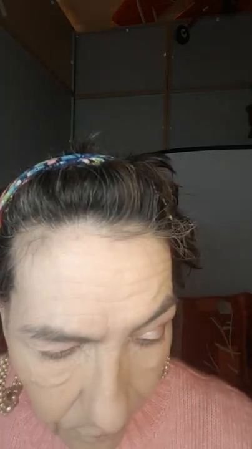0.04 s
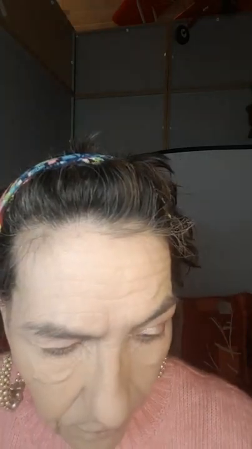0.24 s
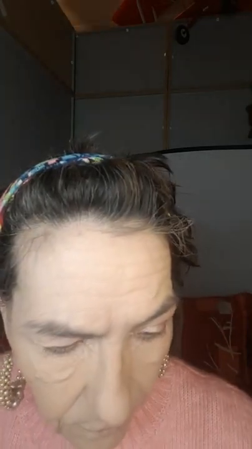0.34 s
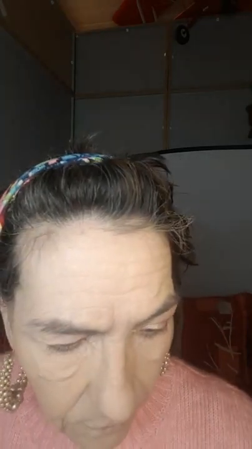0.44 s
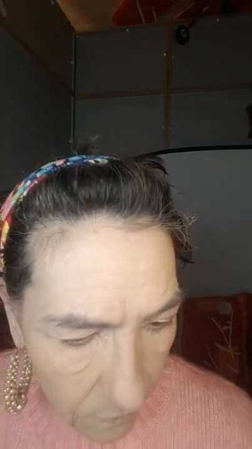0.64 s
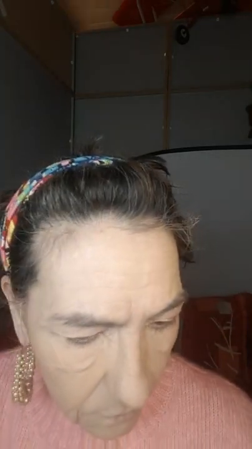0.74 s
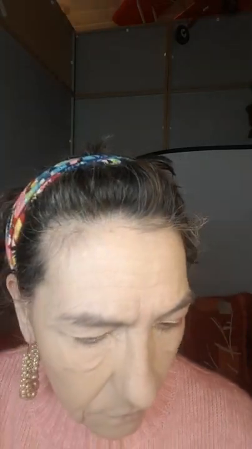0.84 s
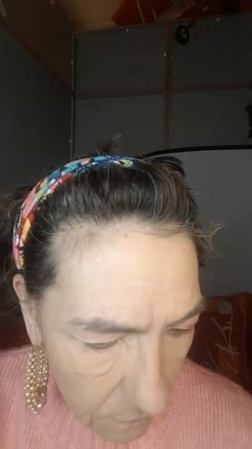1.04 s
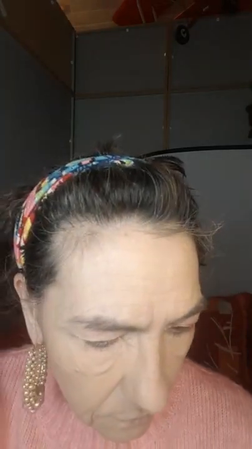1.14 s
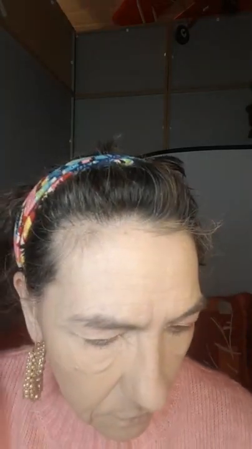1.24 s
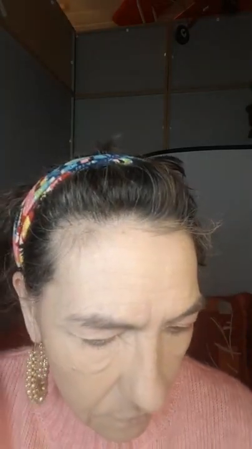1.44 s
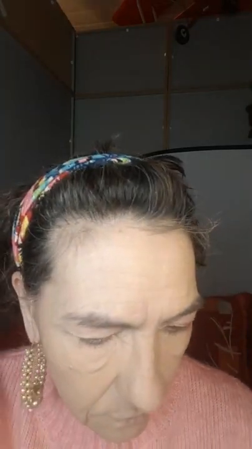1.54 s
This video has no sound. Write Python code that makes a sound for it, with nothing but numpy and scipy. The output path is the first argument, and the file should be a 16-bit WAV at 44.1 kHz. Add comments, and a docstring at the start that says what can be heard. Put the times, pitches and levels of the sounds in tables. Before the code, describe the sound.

Makeup items clatter on a table: a compact knocks down, a plastic case rattles, and a brush drops and bounces. Softer taps and a lid click follow, close to a phone microphone in a small room.

```python
"""Clicks and clatter of cosmetics handled on a table in a small room, close to a phone.
A compact is put down, a plastic case clatters, a brush drops and bounces, small items are nudged
and a lid clicks. Every contact rings the item, knocks the tabletop and gives a sharp tick.
Short skids and tiny metal clinks join in; the room answers over faint air noise and mains hum."""
import sys
import numpy as np
from scipy import signal
from scipy.fft import rfft, irfft, next_fast_len
from scipy.io import wavfile
from scipy.ndimage import map_coordinates

SR = 44100
rng = np.random.default_rng(int(sys.argv[2]) if len(sys.argv) > 2 else 0)


def to_wav(sig):
    """Store sig (one row per channel, or 1-D mono) as 16-bit WAV at the path in sys.argv[1].

    Samples outside -1..1 are clipped; the rate is SR.
    """
    pcm = np.clip(np.atleast_2d(sig), -1, 1) * 32767
    pcm = np.round(pcm).astype(np.int16)
    wavfile.write(sys.argv[1], SR, pcm.T)  # frames by channels


N = 70560


def amp(db):
    return 10 ** (np.asarray(db) / 20)


def along(points, hz):
    """Interpolate (frequency [Hz], value) points on a log axis."""
    point_hz, values = np.transpose(points)
    return np.interp(np.log(hz + 1), np.log(point_hz + 1), values)


def clock():
    """Time [s] over the half second after a contact."""
    return np.arange(SR // 2) / SR


def blow(x):
    """Scale x to the energy of one short blow: 5 ms at rms 1."""
    return x * np.sqrt(0.005 * SR / (np.sum(x ** 2) + 1e-20))


def add(track, start_s, x):
    """Mix x into the track."""
    part = track[max(round(start_s * SR), 0):][:len(x)]
    part += x[:len(part)]


def edge(x, hz, kind):
    """Third-order low-pass or high-pass."""
    return signal.sosfilt(signal.butter(3, hz, kind, fs=SR, output="sos"), x)


def noise(spectrum, size):
    """Coloured noise, rms 1."""
    gain = amp(along(spectrum, np.fft.rfftfreq(size, 1 / SR)))
    x = irfft(rfft(rng.standard_normal(size)) * gain, size)
    return x / x.std()


def burst(spectrum, t60_s):
    """Fast-decaying puff of noise."""
    t = clock()
    return blow(noise(spectrum, len(t)) * amp(-60 * t / t60_s))


def ring(modes, scatter_db, detune, attack_s, aligned=False):
    """Damped modes, varied per contact; aligned ones start in step, with a hard edge."""
    t = clock()
    hz, db, t60_s = np.transpose(modes)[:, :, None]
    level_draw, pitch_draw = rng.standard_normal((2, len(modes), 1))
    sign = 1 if aligned else (-1) ** np.arange(len(modes))[:, None]
    decay = amp(db + scatter_db * level_draw - 60 * t / t60_s)
    waves = sign * decay * np.sin(2 * np.pi * hz * (1 + detune * pitch_draw) * t)
    return blow(waves.sum(0) * (1 - np.exp(-t / attack_s)))


def background():
    """Quiet room air and faint mains hum."""
    air = [(12, -38), (20, -7), (26, -19.5), (54, 0), (74, -7.5), (106, -2.5), (125, -7), (207, -7.5),
           (548, -14.5), (724, -14), (1200, -17), (1370, -17), (6350, -30), (13800, -31), (15500, -21)]  # air spectrum (frequency [Hz], level [dB])
    air_db, hum_db, hum_hz = -70, -82.5, 100
    hum = np.sqrt(2) * np.sin(2 * np.pi * hum_hz * np.arange(N) / SR)
    return amp(air_db) * noise(air, N) + amp(hum_db) * hum


def room(x):
    """Direct sound, near reflections and diffuse tail."""
    walls = [(.0041, -21), (.0071, -17.5), (.0118, -18.5)]  # echoes off nearby surfaces (delay [s], level [dB])
    tail_decay = [(150, .36), (700, 0.41), (1600, 0.37), (4000, 0.35), (9000, 0.26), (14000, 0.17)]  # reverberation time (frequency [Hz], t60 [s])
    tail_colour = [(150, 0), (700, -4.5), (1600, 0), (4000, -1.5), (9000, -6), (14000, 4.5)]  # tail spectrum (frequency [Hz], level [dB])
    early_db, early_delay_s, early_t60_s = -14, 0.004, 0.054
    tail_db, tail_delay_s = -14, 0.01
    t = clock()
    hz, frame_s, bins = signal.stft(rng.standard_normal(len(t)), SR, nperseg=256)
    gain = amp(along(tail_colour, hz)[:, None] - 60 * frame_s / along(tail_decay, hz)[:, None])
    tail = signal.istft(bins * gain, SR, nperseg=256)[1][:len(t)]
    early = rng.standard_normal(len(t)) * amp(-60 * t / early_t60_s)
    response = signal.unit_impulse(len(t))
    for delay_s, db in walls:
        add(response, delay_s, amp(db) * np.hanning(5) / 2)
    add(response, early_delay_s, amp(early_db) * early / np.linalg.norm(early))
    add(response, tail_delay_s, amp(tail_db) * tail / np.linalg.norm(tail))
    return signal.fftconvolve(x, response)


def clinks():
    """Small metal parts touch with a thin, high chink."""
    touches = [(0.732, -76.5), (.7995, -62.5), (1.157, -75.5)]  # metal contacts (time [s], level [dB])
    metal = [(2000, -12.5), (4600, -13), (5500, -18), (7000, -9), (9300, -11), (10500, 1.5), (11600, -1),
             (12800, -12), (15000, -29)]  # chink spectrum (frequency [Hz], level [dB])
    track = np.zeros(N)
    for start_s, db in touches:
        add(track, start_s, room(amp(db) * burst(metal, t60_s=0.031)))
    return track


def slides():
    """Gritty friction as an item skids before it settles."""
    skids = [(.001, 0.031, -59.5), (0.2242, 0.025, -45.5), (0.378, 0.0067, -71), (0.44, 0.0095, -72),
             (0.894, 0.027, -59.5)]  # skids on the table (time [s], length [s], level [dB])
    scrape = [(300, 3), (1200, 15), (2500, 5), (5000, 0), (7000, -3), (9000, -8), (13000, -4), (15000, -16)]  # friction spectrum (frequency [Hz], level [dB])
    rough_db, grains_per_s = 6, 1100
    track = np.zeros(N)
    t = clock()
    for start_s, length_s, db in skids:
        roughness = map_coordinates(rng.standard_normal(len(t)), [t * grains_per_s], order=1)
        grit = amp(rough_db * roughness) * noise(scrape, len(t))
        stroke = np.sqrt(np.clip(4 * t / length_s * (1 - t / length_s), 0, 1))
        add(track, start_s, room(amp(db) * stroke * grit / grit.std()))
    return track


def tabletop(thump_db):
    """Knock on the table: distinct modes, dense wooden ring and low thump."""
    top_modes = [(462, -20, 0.14), (532.3, 2, 0.13), (547, -1.5, 0.14), (572.3, -1.5, .18), (685, -1, .16),
                 (729, -13, 0.42), (831, -0.5, 0.16), (888, -2.5, 0.095), (912, -12, .14), (966, -8.5, .12),
                 (1163, -11, .16)]  # tabletop modes (frequency [Hz], level [dB], t60 [s])
    low_modes = [(150.3, -7, .22), (171, -4, 0.21), (233, 1.5, 0.18), (268.3, -2, .18), (309.3, 1.5, .2),
                 (384, -0.5, 0.1)]  # its low modes (frequency [Hz], level [dB], t60 [s])
    grain = [(100, -19.5), (400, -28.5), (520, -3), (700, -1), (1000, -10.5), (1500, -11.5), (2500, -21),
             (6000, -52)]  # its dense ring (frequency [Hz], level [dB])
    knock = ring(top_modes, scatter_db=2, detune=0.008, attack_s=0.0006)
    thump = ring(low_modes, scatter_db=2.5, detune=0.02, attack_s=0.0077)
    wood = amp(5) * burst(grain, t60_s=0.065)
    return blow(knock + wood) + amp(thump_db) * thump


def item(hits, modes, crack_db, crack_t60_s, thump_db, tick_t60_s):
    """Contacts ring the item, knock the table and tick; softer ones ring duller."""
    crack_spectrum = [(100, -48), (400, -29.5), (700, 4), (2000, 4), (5000, 4), (10000, -1), (15000, 28)]  # noisy part of the ring (frequency [Hz], level [dB])
    tick_spectrum = [(500, 7), (3000, 2.5), (5500, 3), (7000, 1.5), (8000, -1), (8900, 6.5), (10200, -6.5),
                     (12000, -7), (14200, -15.5), (15500, -40)]  # contact tick (frequency [Hz], level [dB])
    low_cut_hz = 518
    track = np.zeros(N)
    for start_s, ring_db, hardness_hz, knock_db, tick_db in hits:
        body = ring(modes, scatter_db=3, detune=0.026, attack_s=0.000214, aligned=True)
        body += amp(crack_db) * burst(crack_spectrum, crack_t60_s)
        body = edge(body, hardness_hz, "lowpass")
        body = amp(ring_db) * blow(edge(body, low_cut_hz, "highpass"))
        knock = amp(knock_db) * tabletop(thump_db)
        tick = amp(tick_db) * burst(tick_spectrum, tick_t60_s)
        add(track, start_s, room(body + knock + tick))
    return track


def nudges():
    """Small items tap the table, too light for much thump."""
    hits = [(.616, -50, 2180, -49, -83), (.6375, -46, 1040, -54, -100), (.645, -57, 1190, -46.5, -94),
            (.652, -62, 1210, -68, -86), (.6903, -46.5, 1800, -90, -73), (.7003, -52.5, 1660, -59.5, -88),
            (.8905, -60.5, 5200, -51, -57), (.918, -43.5, 1790, -52, -65), (.945, -79, 2500, -58, -66.5),
            (.962, -65, 2520, -82, -76), (.978, -49, 1450, -65, -76), (1.49, -67.5, 980, -73, -95)]  # contacts (time [s], ring [dB], hardness [Hz], knock [dB], tick [dB])
    modes = [(689, 8, .018), (787, -7, 0.0049), (1114, 6.5, 0.012), (1468, 1.5, 0.023), (1868, 0.5, 0.024),
             (2350, 2.5, 0.017), (4760, -8, .008)]  # item modes (frequency [Hz], level [dB], t60 [s])
    return item(hits, modes, crack_db=10, crack_t60_s=0.013, thump_db=-21, tick_t60_s=0.053)


def lid():
    """A lid clicks: two contacts in quick succession."""
    hits = [(.9942, -40.5, 4300, -51, -67), (.9997, -46, 4600, -57.5, -64)]  # contacts (time [s], ring [dB], hardness [Hz], knock [dB], tick [dB])
    modes = [(1233, -9.5, 0.035), (1470, -6, 0.024), (1870, 1, 0.015), (2290, -7, 0.013), (2515, -9, 0.011),
             (3240, -7.5, 0.0094), (3705, -12, 0.011)]  # lid modes (frequency [Hz], level [dB], t60 [s])
    return item(hits, modes, crack_db=1.5, crack_t60_s=0.014, thump_db=-13, tick_t60_s=0.012)


def brush():
    """A brush drops and bounces with hard, bright contacts."""
    hits = [(.008, -56, 5100, -64, -63.5), (.5042, -34, 10500, -47.5, -36.5),
            (.5155, -59, 2200, -42.5, -66), (.5215, -56, 3500, -70, -77), (.532, -38, 6000, -46.5, -45.5),
            (.5473, -42, 4500, -46.5, -54), (.567, -46, 3200, -47, -63), (.5765, -52, 2520, -64, -72)]  # contacts (time [s], ring [dB], hardness [Hz], knock [dB], tick [dB])
    modes = [(1393, 2.5, 0.023), (1589, -4, 0.059), (1843, -0.5, 0.04), (2460, 5, 0.012), (3210, 4, 0.016),
             (3570, 2.5, 0.015), (4120, 0.5, 0.011), (5510, 1.5, .014), (7400, 4, 0.0072), (8700, -4, 0.02)]  # brush modes (frequency [Hz], level [dB], t60 [s])
    return item(hits, modes, crack_db=-2, crack_t60_s=0.007, thump_db=-11, tick_t60_s=0.02)


def plastic_case():
    """A plastic case clatters in a rapid run of contacts."""
    hits = [(.3468, -31.5, 4870, -36, -52.5), (.3645, -34.5, 4030, -43.5, -58.5),
            (.3773, -42.5, 2430, -48, -67), (.3868, -36.5, 1620, -52.5, -61),
            (.3915, -38.5, 7070, -53, -47.5), (.4099, -35, 3760, -40.5, -55.5), (.424, -43, 2970, -36, -60),
            (.4342, -44.5, 2980, -51, -71), (.4372, -64, 1980, -45, -50.5), (.4459, -37.5, 1470, -38, -64),
            (.4535, -43.5, 850, -39, -79), (.4595, -63, 1900, -57, -65)]  # contacts (time [s], ring [dB], hardness [Hz], knock [dB], tick [dB])
    modes = [(717, 2, 0.02), (965, 0.5, 0.013), (1322, -6, 0.023), (1607, -5.5, 0.023), (2320, 5.5, 0.0098),
             (2740, -13.5, .012), (3890, 0, 0.011), (4530, -3.5, 0.0076), (5420, -8, 0.013)]  # case modes (frequency [Hz], level [dB], t60 [s])
    return item(hits, modes, crack_db=0.5, crack_t60_s=0.0054, thump_db=-9.5, tick_t60_s=0.017)


def compact():
    """A compact is put down; its weight thumps the table."""
    hits = [(.1922, -54.5, 6100, -92, -65), (.2076, -28.5, 2000, -35.5, -43.5),
            (.2147, -34, 950, -47, -71.5), (.2252, -34, 1600, -40, -46.5), (.2328, -41, 5930, -51, -48),
            (.2385, -47, 3000, -69, -59), (.2462, -38.5, 1740, -40, -57.5), (.2555, -42, 3060, -60, -77),
            (.2608, -65, 2000, -53.5, -62)]  # contacts (time [s], ring [dB], hardness [Hz], knock [dB], tick [dB])
    modes = [(694, 1, 0.012), (847, -0.5, 0.017), (984, -6, 0.018), (1150, -12.5, .025),
             (1310, -11.5, 0.045), (1560, -15.5, 0.023), (1850, -21.5, .02), (3000, -7.5, 0.017),
             (4650, -17, .01)]  # compact modes (frequency [Hz], level [dB], t60 [s])
    return item(hits, modes, crack_db=-3.5, crack_t60_s=0.021, thump_db=-1.5, tick_t60_s=0.017)


def scene():
    """All items, with their deep bass cut away below about 125 Hz, over the background."""
    handling = compact() + plastic_case() + brush() + nudges() + lid() + slides() + clinks()
    return (edge(handling, hz=125, kind="highpass") + background())[None]


def record(dry):
    """The phone's band limit."""
    top_hz = 14600
    size = next_fast_len(N + SR // 2)
    passband = np.fft.rfftfreq(size, 1 / SR) < top_hz
    return irfft(rfft(dry, size) * passband, size)[:, :N]


dry = scene()
out = record(dry)
to_wav(out)
```